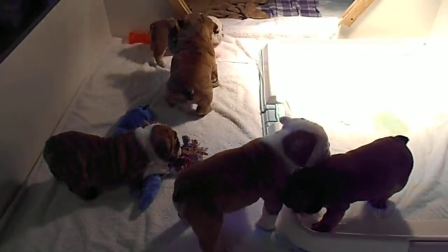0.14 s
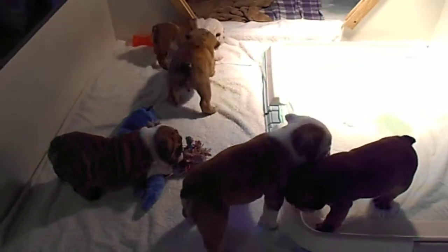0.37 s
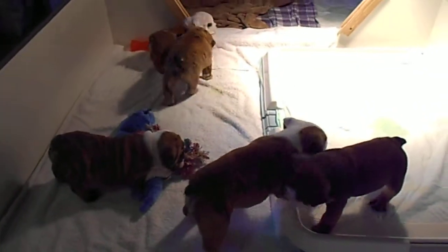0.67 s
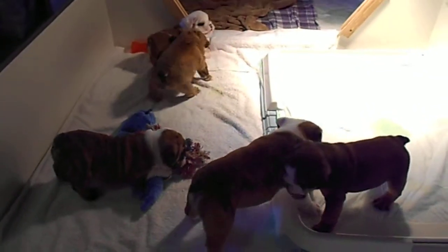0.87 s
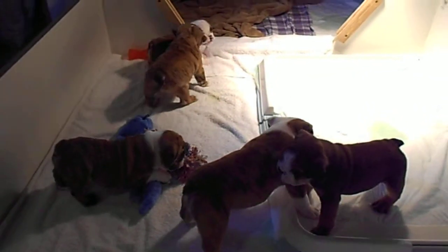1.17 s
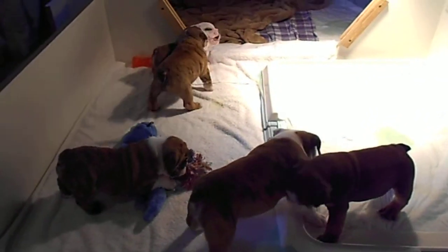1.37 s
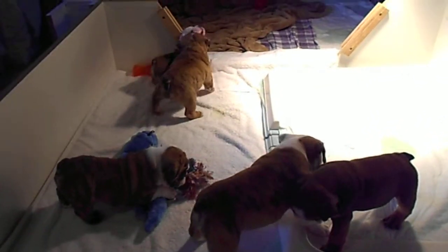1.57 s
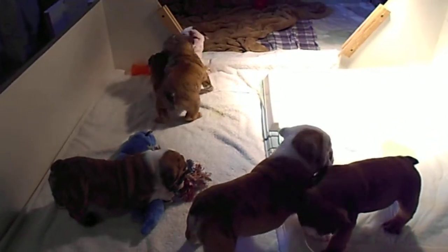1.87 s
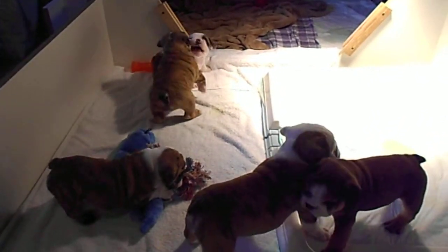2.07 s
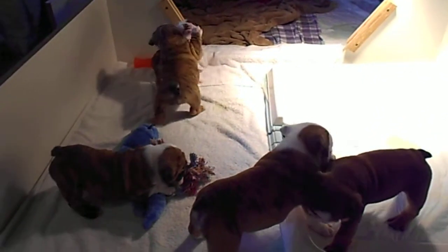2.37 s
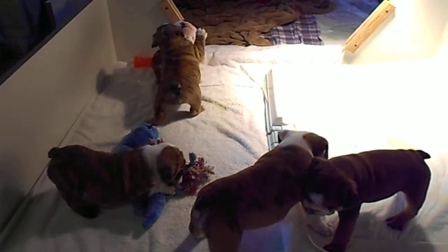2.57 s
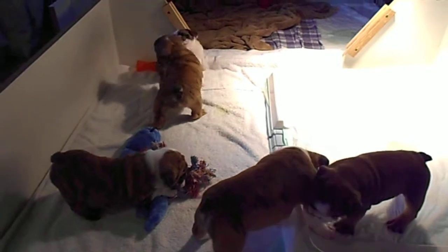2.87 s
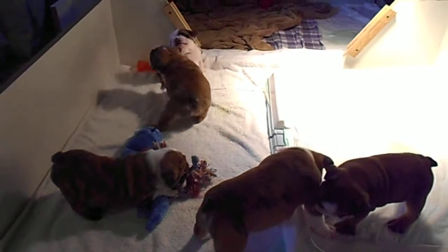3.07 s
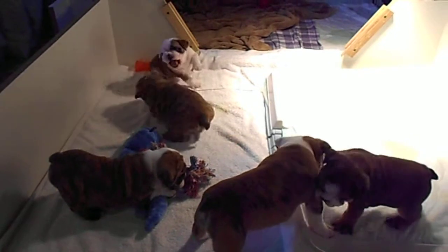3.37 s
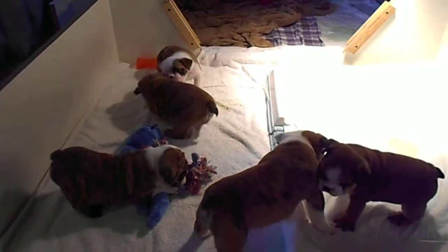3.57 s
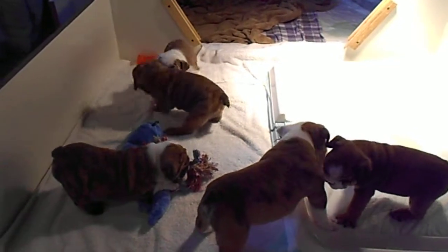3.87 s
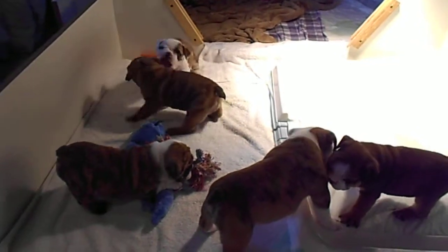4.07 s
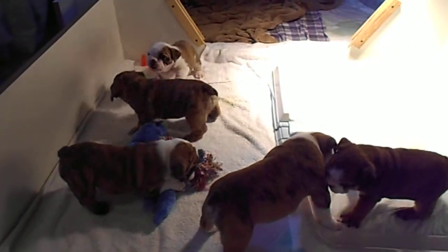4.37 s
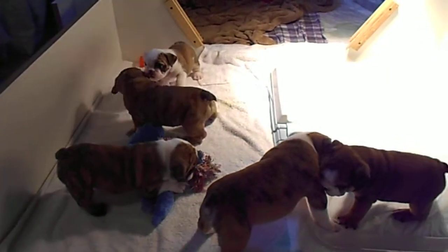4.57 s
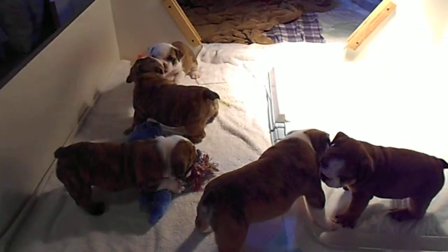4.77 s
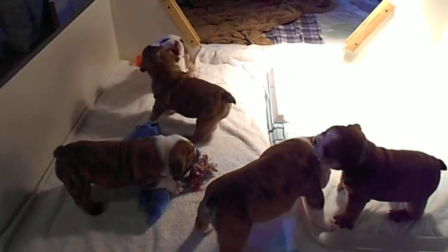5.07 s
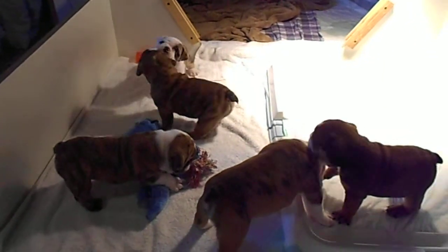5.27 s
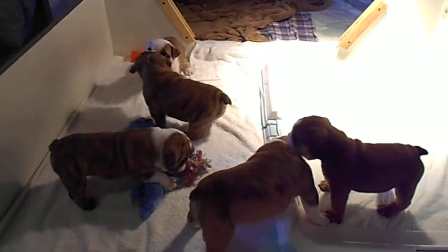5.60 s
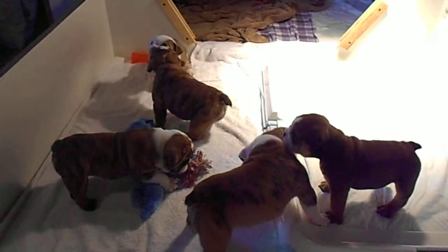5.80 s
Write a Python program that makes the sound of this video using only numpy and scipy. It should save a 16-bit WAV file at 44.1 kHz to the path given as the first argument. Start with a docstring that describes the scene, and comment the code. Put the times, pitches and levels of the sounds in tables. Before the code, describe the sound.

Puppies play-fight in a walled indoor pen. Five rough, fluttering growls follow one another with brief gaps, the second and third hardening into snarls. Soft low paw thumps come mostly in the first second, with small sharp claw ticks scattered around and blanket rustle throughout. The microphone is fairly close, in a small reflective space, with dull upper treble, a thin crackly fizz following the growls and a faint low hum.

```python
"""In a walled indoor pen, puppies wrestle on a blanket and growl in five short bouts.
Each growl is a train of uneven slaps and puffs of air, ringing in chest, throat, jaw and lips.
It throbs about 25 times a second and turns to a snarl as the lips draw back.
Paws thump (fading low tones), claws tick and scratch, the blanket rustles (shaped noise).
Separate thin treble noise follows the level of growls and rustle; a quiet room hums faintly."""
import sys
import numpy as np
from scipy import signal
from scipy.fft import rfft, irfft
from scipy.io import wavfile
from scipy.ndimage import uniform_filter1d

SR = 44100
rng = np.random.default_rng(int(sys.argv[2]) if len(sys.argv) > 2 else 0)


def unload_wav(signal):
    """Save mono or channel-first audio to the path in sys.argv[1] as 16-bit WAV at rate SR, clipped to [-1, 1]."""
    wavfile.write(
        sys.argv[1],
        SR,
        np.round(np.clip(np.atleast_2d(signal).T, -1, 1) * 32767).astype(np.int16),
    )


N = 261954
TIME = np.arange(N) / SR   # seconds


def from_db(db):
    """Turn decibels into a gain."""
    return 10 ** (np.asarray(db) / 20)


def rms_one(x):
    """Scale a sound so its average strength (rms) is 1."""
    return x / np.sqrt(np.mean(x ** 2) + 1e-20)


def envelope(x, seconds):
    """Follow the strength of a sound with a running rms."""
    size = max(int(seconds * SR), 2)
    power = uniform_filter1d(uniform_filter1d(x ** 2, size), size)
    return np.sqrt(np.abs(power) + 1e-14)


def in_time(rows):
    """Draw straight lines between the timed rows, giving each column at every sample."""
    seconds, *columns = np.transpose(rows)
    return [np.interp(TIME, seconds, column) for column in columns]


def coloured(spectrum):
    """Noise shaped to a spectrum, falling away beyond its ends; rms 1."""
    hz, db = np.transpose(spectrum)
    size = 2 ** 18
    f = np.maximum(np.fft.rfftfreq(size, 1 / SR), 1)
    ends = np.minimum(1, np.minimum(f / hz[0], hz[-1] / f)) ** 4
    gain = from_db(np.interp(np.log(f), np.log(hz), db)) * ends
    noise = irfft(gain * rfft(rng.standard_normal(size)))
    return rms_one(noise[:N])


def resonate(x, hz, width_hz):
    """Ring at one pitch, like a struck hollow; gain 1 at the peak."""
    r = np.exp(-np.pi * width_hz / SR)
    feed = np.array([1, 0, -1]) * (1 - r * r) / 2
    return signal.lfilter(feed, [1, -2 * r * np.cos(2 * np.pi * hz / SR), r * r], x)


def burst(start, decay_s):
    """A quick rise and an exponential fall."""
    age = np.maximum(TIME - start, 0)
    rise = np.minimum(age / (decay_s / 10), 1)
    return rise * np.exp(-np.minimum(age / decay_s, 20))


# colour of the quiet room: pitch_hz [Hz], level_db [dB, relative]
ROOM_COLOUR = [(12, -39), (20, -15), (65, -1.5), (92, -9.5), (184, -19), (394, -14), (463, -5.5),
               (583, -13), (752, -22), (1850, -25.5), (2180, -74), (3540, -44), (5000, -51), (6500, -58),
               (11000, -120)]
ROOM_DB, HUM_DB, HUM_HZ = -54, -61.5, 58.8   # both levels are rms


def quiet_room():
    """Steady shaped noise and a faint mains hum, a single low tone."""
    hum = np.sqrt(2) * np.sin(2 * np.pi * HUM_HZ * TIME)
    return from_db(ROOM_DB) * coloured(ROOM_COLOUR) + from_db(HUM_DB) * hum


# colour of the thin treble noise: pitch_hz [Hz], level_db [dB, relative]
FIZZ_COLOUR = [(2500, -8), (4200, -62), (5200, -22), (6200, -13), (7200, -8.5), (8200, -6.5), (9500, 1.5),
               (10500, 0.5), (11500, -12), (12300, -40)]


def fizz(crackle_db):
    """Thin treble noise whose level jumps at random, making it crackle; rms 1."""
    grain = rms_one(uniform_filter1d(rng.standard_normal(N), size=90))
    return rms_one(from_db(crackle_db * grain) * coloured(FIZZ_COLOUR))


# how hard the blanket is scuffled: time_s [s], level_db [dB]
SCUFFLE_LEVEL = [(0, -41), (0.15, -45), (0.32, -45), (0.55, -41.5), (2.2, -48), (2.3, -43.5), (2.4, -46),
                 (3.45, -46), (3.6, -48), (3.75, -51), (4.4, -42), (4.55, -43), (4.7, -49.5), (4.85, -48),
                 (5.94, -44)]
# colour of the scuffling: pitch_hz [Hz], level_db [dB, relative]
BLANKET_COLOUR = [(71, -12.5), (120, 1.5), (152, -1.5), (183, -1.5), (270, 1), (306, 1.5), (489, -9.5),
                  (658, -5.5), (1230, -12.5), (1550, -17), (2090, -21), (3280, -25.5), (5000, -34.5),
                  (6500, -50), (11000, -120)]
FIZZ_BESIDE_SCUFFLE_DB = -13   # thin treble noise, relative to the scuffling


def blanket():
    """Scuffling on cloth, with a separate thin treble noise that follows its level."""
    level = from_db(in_time(SCUFFLE_LEVEL)[0])
    scuffling = level * coloured(BLANKET_COLOUR)
    treble = level * from_db(FIZZ_BESIDE_SCUFFLE_DB) * fizz(crackle_db=1.0)
    return scuffling + treble


# paws and bodies landing on the padded floor:
# start_s [s], level_db [dB, before shaping], pitch_hz [Hz], fade_s [s to fall 60 dB]
LANDINGS = [(0.37, -26.5, 156, 0.071), (0.423, -12.5, 189, 0.033), (0.449, -34, 220, 0.31),
            (0.777, -23, 155, 0.07), (0.794, -15.5, 120, 0.059), (0.835, -32, 74, 0.071),
            (0.946, -25.5, 141, 0.041), (3.275, -24.5, 131, 0.049), (3.572, -34.5, 149, 0.17),
            (3.611, -35.5, 203, 0.1), (4.846, -27.5, 170, 0.066)]


def thumps():
    """Soft weight sets the floor ringing for a few cycles: low tones that die away."""
    total = 0
    for start, db, hz, fade_s in LANDINGS:
        soft_start = np.clip((TIME - start) / 0.0025, 0, 1)
        tone = 1.18 * np.sin(2 * np.pi * hz * (TIME - start))
        total = total + from_db(db) * burst(start, fade_s / np.log(1000)) * soft_start * tone
    return total


# sharp claw ticks: start_s [s], level_db [dB, before a 1.5 dB cut]
CLAW_TICKS = [(0.390, -37), (0.536, -37), (0.553, -39), (0.607, -30), (1.172, -51), (1.246, -52),
              (1.430, -25), (1.527, -30), (1.732, -31), (2.211, -35), (4.172, -34), (5.142, -39),
              (5.195, -40), (5.911, -34.5)]
# colour of the ticks: pitch_hz [Hz], level_db [dB, relative]
SNAP_COLOUR = [(1000, -15), (3000, -16), (5000, -4), (7000, -5), (9000, 2), (11000, 7), (12500, -48)]


def ticks():
    """Very short bright snaps of noise."""
    snaps = sum(from_db(db - 1.5) * burst(start, 0.0021) for start, db in CLAW_TICKS)
    return snaps * coloured(SNAP_COLOUR)


# effort of the voice, one list for each of five bouts: time_s [s], level_db [dB, before a cut]
BOUT_EFFORT = [
    [(0.57, -53), (0.586, -30), (0.626, -24.5), (0.69, -28.5), (0.696, -23.5), (0.8, -24.5), (0.862, -48),
     (0.882, -35.5), (0.92, -55)],
    [(0.96, -38), (0.962, -35.5), (1.284, -27), (1.32, -32), (1.648, -26.5), (1.91, -33), (1.924, -26),
     (2.072, -31), (2.15, -68)],
    [(2.445, -31), (2.451, -31), (2.479, -25), (2.633, -26.5), (2.645, -30.5), (2.847, -21), (3.071, -23),
     (3.287, -32), (3.35, -66)],
    [(3.83, -40), (3.84, -41), (3.912, -37), (3.94, -43.5), (4.086, -31.5), (4.304, -23), (4.328, -36),
     (4.342, -24.5), (4.45, -54.5)],
    [(4.89, -53), (4.91, -39), (5.146, -28), (5.164, -19.5), (5.448, -31), (5.482, -25.5), (5.798, -25),
     (5.866, -35.5), (5.94, -25)],
]


def bouts(fade_s):
    """A gate open during each bout, with a fade outside each end, and the effort in dB."""
    gate = 0
    for bout in BOUT_EFFORT:
        inside = np.minimum(TIME - bout[0][0], bout[-1][0] - TIME)
        gate = gate + np.clip(inside / fade_s + 1, 0, 1)
    loud_db = in_time([row for bout in BOUT_EFFORT for row in bout])[0]
    return np.minimum(gate, 1), loud_db


# sudden pushes of the voice: start_s [s], level_db [dB], decay_s [s]
VOICE_PUSHES = [(0.625, -24.5, 0.0093), (0.699, -21.5, 0.0076), (0.946, -28.5, 0.0086), (0.99, -33, 0.02),
                (1.063, -30.5, 0.008), (1.138, -24, 0.0086), (1.248, -25, 0.017), (1.358, -30.5, 0.013),
                (2.42, -24, 0.0053), (2.446, -21.5, 0.016), (2.717, -26, 0.009), (4.088, -28, 0.0061),
                (4.127, -35.5, 0.0062), (4.916, -49, 0.0071), (5.1568, -19, 0.0053), (5.203, -19.5, 0.014),
                (5.922, -23, 0.0055)]


def pushes():
    """Sudden pushes of the voice: each rises at once and dies away."""
    return sum(from_db(db) * burst(start, decay_s) for start, db, decay_s in VOICE_PUSHES)


# the growls, each starting on a throb; levels are relative to the effort, before further changes:
# start_s [s], throb_rate [per s], throb_depth_db [dB], chest_hz [Hz], chest_db [dB], jaw_db [dB],
# snarl_hz [Hz], snarl_db [dB], fizz_db [dB, thin treble noise beside the growl]
GROWL_ROWS = [(0.61, 21.2, 1.5, 248, -1.5, -7, 1560, -12.5, -33.5),
              (0.953, 26.2, 8.5, 256, -0.5, -1, 1970, -15.5, -23.5),
              (1.385, 25.9, 8, 304, -1, -2.5, 1980, -15.5, -24),
              (1.809, 26.0, 5, 329, -1.5, -1.5, 2220, -7, -25),
              (2.417, 23.5, 4, 262, -2.5, -2.5, 2080, -14.5, -25),
              (2.837, 27.2, 4.5, 290, -2.5, -4, 1970, -11, -24.5),
              (3.062, 23.8, 2.5, 307, 0.5, -2, 1980, -11, -23),
              (3.863, 22.1, 3.5, 256, 1, -2, 1930, -16.5, -32),
              (4.096, 24.2, 3.5, 254, -3, 0.5, 2000, -14, -23.5),
              (4.929, 19.0, 3, 224, -0.5, -0.5, 1760, -14, -33),
              (5.162, 26.8, 2.5, 276, -4, -0.5, 1950, -14.5, -27),
              (5.484, 19.8, 2.5, 279, -2.5, -1, 1980, -13.5, -28),
              (5.885, 24, 9, 287, 0.5, 0, 2090, -5, -30)]
GLIDE_S = 0.034   # the throat takes this long to settle into the next growl


def growl_shape():
    """Time from the present growl's start, its throb rate, and other columns gliding between growls."""
    rows = np.array(GROWL_ROWS)
    # each growl takes over 22 ms before its start
    present = np.maximum(np.searchsorted(rows[:, 0], TIME + 0.022) - 1, 0)
    start, rate, *shape = rows[present].T
    return [TIME - start, rate] + [uniform_filter1d(c, int(GLIDE_S * SR)) for c in shape]


# the lips draw back: start_s [s], hold_s [s, rise included], snarl_boost_db [dB, below 0 does nothing],
# hiss_db [dB past the teeth], ring_db [dB, ring of the lip gap]; hiss and ring are cut further later
LIP_MOVES = [(0.726, 0.035, -6, -44, -66), (1.516, 0.085, 12.5, -40.5, -30), (1.65, 0.11, 11, -32, -56),
             (2.788, .11, -4, -41, -46), (3.03, 0.057, -7, -67, -33.5), (4.24, 0.065, -1.5, -56, -47),
             (5.178, 0.16, 3, -43.5, -42)]
LIP_ATTACK_S, LIP_RELEASE_S = 0.0087, 0.044


def lip_curls():
    """Lips snap back, hold and relax: how far drawn (0-1), snarl boost in dB, gains of hiss and ring."""
    curls = []
    for start, hold, *_ in LIP_MOVES:
        snap = np.clip((TIME - start) / LIP_ATTACK_S, 0, 1)
        relax = np.exp(-np.clip((TIME - start - hold) / LIP_RELEASE_S, 0, 20))
        curls.append(snap * relax)
    drawn = np.array(curls)
    boost_db, hiss_db, ring_db = np.transpose(LIP_MOVES)[2:]
    boost = (boost_db[:, None] * drawn).max(axis=0)   # the largest wins
    return drawn.max(axis=0), boost, from_db(hiss_db) @ drawn, from_db(ring_db) @ drawn


def folds(flap_hz, jitter, air):
    """Slack vocal folds slap at uneven intervals, each slap letting out a puff of turbulent air."""
    chance = rng.standard_normal((1500, 2))
    at = (np.cumsum(np.exp(jitter * chance[:, 0])) * SR / flap_hz).astype(int)
    slaps = np.zeros(N)
    slaps[at[at < N]] = from_db(2 * chance[at < N, 1])   # uneven strength too
    puff_shape = signal.lfilter([1], [1, -np.exp(-1 / (.004 * SR))], slaps)   # dies away over 4 ms
    puffs = puff_shape * rng.standard_normal(N)
    return rms_one(slaps) + air * rms_one(puffs)


THROB_SKEW = 0.39   # above 0, a throb opens faster than it closes


def throb(age, rate, depth_db):
    """The loose throat flutters, opening faster than it closes; a gain with running mean power near 1."""
    phase = 2 * np.pi * age * rate
    swing = np.cos(phase) - THROB_SKEW * np.sin(2 * phase)
    gain = from_db(uniform_filter1d(depth_db * swing, size=130))
    return gain / envelope(gain, .04)


WANDER_PER_S = 22   # new random targets per second


def wander():
    """The throat never holds quite still: straight glides between random targets of spread 1."""
    return np.interp(TIME * WANDER_PER_S, np.arange(400), rng.standard_normal(400))


def formants(source, modes, centre_hz=None):
    """Steep throat resonances side by side, leaning toward centre_hz, with the level evened out."""
    hz, width, db = np.transpose(modes)
    power = from_db(db) ** 2
    mean = np.average(hz, weights=power)
    lean = 0 if centre_hz is None else (centre_hz - mean) / np.var(hz)
    shares = power[:, None] * np.exp(np.outer(hz - mean, lean))
    y = 0
    for f, w, share in zip(hz, width, shares / shares.sum(axis=0)):
        drive = source * rng.choice([-1, 1], N)   # each slap catches each resonance in its own phase
        ringing = resonate(resonate(drive, f, w), f, w)
        y = y + np.sqrt(share) * rms_one(ringing)
    return y / envelope(y, .012)


# colour of air hissing past the teeth: pitch_hz [Hz], level_db [dB, relative]
HISS_COLOUR = [(2500, -4), (3000, -13.5), (3550, -12.5), (4100, -17), (4800, -27.5), (6000, -29.5)]


def teeth_air():
    """Turbulent air past the teeth: shaped noise; rms 1."""
    return coloured(HISS_COLOUR)


# resonances of chest, throat, jaw, snarl and lip gap:
# pitch_hz [Hz], width_hz [Hz, for each of two passes], level_db [dB, relative within its table]
CHEST_MODES = [(212.4, 56, -3), (272.5, 57, -0.5), (318, 59.4, -1)]
THROAT_MODES = [(485, 89, -0.1), (602, 88, -5.5), (712.5, 78, -1)]
JAW_MODES = [(861.6, 188, 13), (963, 90, 3), (1105, 220, -3.5), (1193, 180, -3)]
SNARL_MODES = [(1520, 530, 22.3), (1967, 266, 15.3), (2300, 394, 15.7), (2800, 143, 0.5)]
LIP_MODES = [(2416, 200, 10), (2720, 220, -8.5)]
# effort shifts pitch and brightness: change per dB above the usual
USUAL_EFFORT_DB = -25.5
CHEST_HZ_PER_DB, JAW_HZ_PER_DB = 1.4, 5.5
CHEST_DB_PER_DB, JAW_DB_PER_DB, SNARL_DB_PER_DB, FIZZ_DB_PER_DB = 0.11, 0.1, -0.01, 0.05
JAW_HZ = 944   # at the usual effort
LIP_RISE_HZ = 260   # drawn lips also raise the snarl resonance
CHEST_WANDER_HZ, SNARL_WANDER_HZ, SNARL_WANDER_DB = 9.2, 60, 2.5
FIZZ_SWELL = 1.2   # how strongly the thin treble noise follows each throb (power of the throb gain)


def growls():
    """One rough voice through its resonances, plus thin crackling treble noise that follows its level."""
    gate, loud_db = bouts(fade_s=0.011)
    age, rate, depth_db, chest_hz, chest_db, jaw_db, snarl_hz, snarl_db, fizz_db = growl_shape()
    drawn, boost_db, hiss_gain, ring_gain = lip_curls()
    strain = loud_db - USUAL_EFFORT_DB
    voice = folds(flap_hz=119.83, jitter=.25, air=0.94)
    flutter = throb(age, rate, depth_db)
    push = pushes()
    effort = np.hypot(gate * from_db(loud_db - 1.5) * flutter, push)

    chest_centre = chest_hz + CHEST_HZ_PER_DB * strain + CHEST_WANDER_HZ * wander()
    chest_gain = from_db(chest_db + CHEST_DB_PER_DB * strain - 3.0)
    chest = chest_gain * formants(voice, CHEST_MODES, chest_centre)

    # an opening jaw moves the energy from the throat resonances up to its own
    opening = from_db(jaw_db + JAW_DB_PER_DB * strain)
    closed = np.sqrt(np.clip(1 - opening ** 2, .2, 1))
    throat = from_db(-1.5) * closed * formants(voice, THROAT_MODES)
    jaw = from_db(-4.0) * opening * formants(voice, JAW_MODES, JAW_HZ + JAW_HZ_PER_DB * strain)

    # the voice is brightest at the top of each throb
    bite_db = snarl_db + SNARL_DB_PER_DB * strain + boost_db + SNARL_WANDER_DB * wander()
    snarl_centre = snarl_hz + LIP_RISE_HZ * drawn + SNARL_WANDER_HZ * wander()
    rasp = formants(voice, SNARL_MODES, snarl_centre)
    snarl = from_db(bite_db - 4.0) * flutter ** 0.083 * rasp

    hiss = from_db(-6.0) * hiss_gain * teeth_air()
    ring = from_db(-4.0) * ring_gain * formants(voice, LIP_MODES)
    # a sudden push also rasps and spits air through the teeth
    spit = push * from_db(-25) * (teeth_air() + rasp)
    growl = effort * (chest + throat + jaw + snarl) + flutter * (hiss + ring) + spit

    treble_gain = gate * from_db(loud_db + fizz_db + FIZZ_DB_PER_DB * strain - 0.5)
    treble = treble_gain * flutter ** FIZZ_SWELL * fizz(crackle_db=7.5)
    return growl + treble


# claws scratching over the cloth, and one short knock at 3.27 s: start_s [s], level_db [dB], decay_s [s]
CLAW_SCRATCHES = [(2.128, -50.5, 0.035), (2.167, -47, 0.046), (3.271, -33.5, 0.0027), (5.887, -60, 0.007)]
# colour of the scratches: pitch_hz [Hz], level_db [dB, relative]
CLOTH_COLOUR = [(1200, -28), (2200, -3.5), (3200, -15.5), (4500, -25.5)]


def scratches():
    """Short rasps of claws on cloth and one brief knock: bursts of shaped noise."""
    strokes = sum(from_db(db) * burst(start, decay_s) for start, db, decay_s in CLAW_SCRATCHES)
    return strokes * coloured(CLOTH_COLOUR)


# standing waves between the pen walls: pitch_hz [Hz], width_hz [Hz], boost_db [dB, each on its own]
WALL_MODES = [(201, 29, 2), (271, 17, 2.5), (290.2, 6, 6), (543, 170, -1), (440, 39, 4), (473, 115, -4.5),
              (604, 58, 5), (713, 16, -4.5), (884, 57, -1.5), (900, 18, 3), (960, 7.6, -7), (900, 8, -11.5),
              (1090, 7.3, 6.5), (1133, 5.7, -9)]


def standing_waves(x):
    """The pen walls favour some pitches and swallow others."""
    for hz, width, db in WALL_MODES:
        x = x + (from_db(db) - 1) * resonate(x, hz, width)
    return x


def room(x, t60_s, wet_db):
    """Dense reflections, whose pattern changes four times a second as the puppies move about."""
    hop, age = SR // 4, TIME[:SR // 2]
    padded, out = np.pad(x, (hop, 2 * hop)), np.zeros(N + 5 * hop)
    fade_in_out = np.sin(np.linspace(0, np.pi, 2 * hop))   # overlapping pieces blend
    for i in range(0, N + hop, hop):
        # random echoes from 3 ms on, dying by 60 dB in t60_s
        tail = rng.standard_normal(len(age)) * from_db(-60 * age / t60_s) * (age > .003)
        piece = padded[i:i + 2 * hop] * fade_in_out
        wet = signal.fftconvolve(piece, tail / np.linalg.norm(tail))
        out[i:i + len(wet)] += wet
    return x + from_db(wet_db) * out[hop:hop + N]


def scene():
    """Puppies in the pen over a quiet room with a faint mains hum."""
    voices = room(standing_waves(growls()), t60_s=0.25, wet_db=-1)
    paws = room(thumps() + scratches(), t60_s=0.28, wet_db=-3.5) + ticks()
    return (voices + paws + blanket() + quiet_room())[None]


# hollows in the treble: pitch_hz [Hz], width_hz [Hz]
TREBLE_HOLLOWS = [(5512, 2940), (11025, 720)]
CUTOFF_HZ = 12300


def record(dry):
    """Two hollows in the treble, and little above the cutoff."""
    x = dry[0]
    for hz, width in TREBLE_HOLLOWS:
        x = signal.lfilter(*signal.iirnotch(hz, hz / width, fs=SR), x)
    low_top = signal.ellip(10, .2, 80, CUTOFF_HZ, fs=SR, output="sos")
    return signal.sosfilt(low_top, x)[None]


dry = scene()
out = record(dry)
unload_wav(out)
```